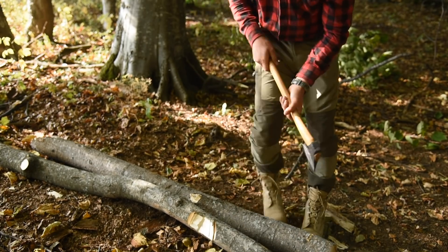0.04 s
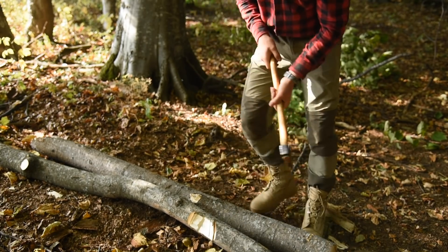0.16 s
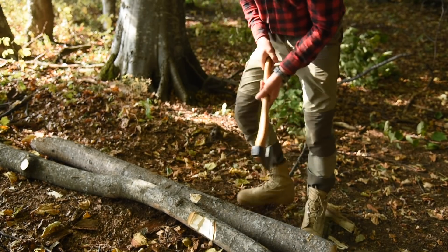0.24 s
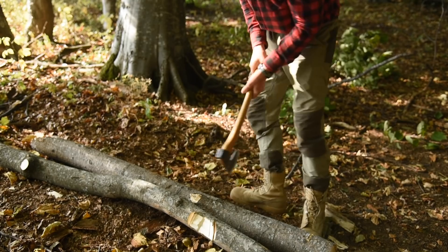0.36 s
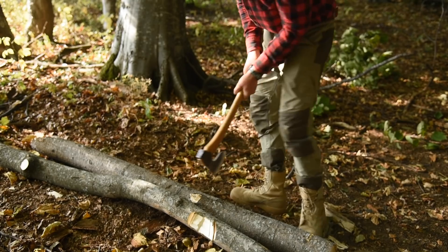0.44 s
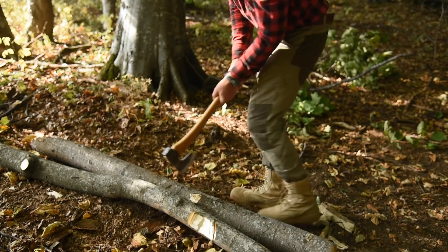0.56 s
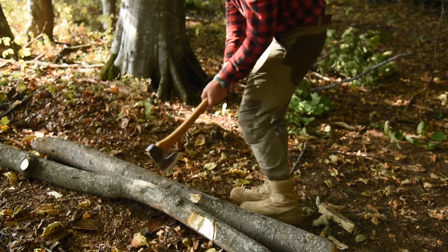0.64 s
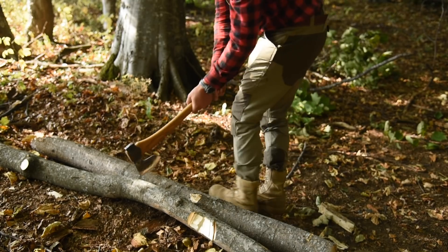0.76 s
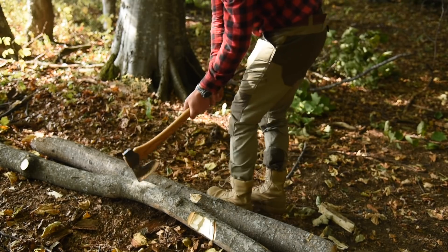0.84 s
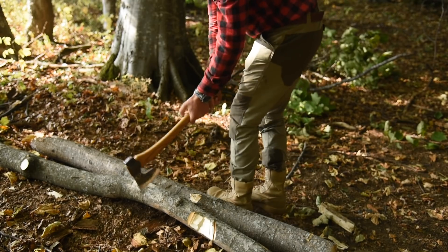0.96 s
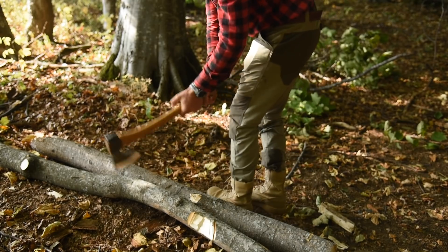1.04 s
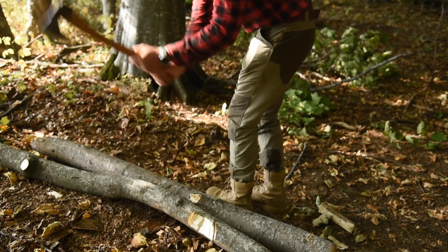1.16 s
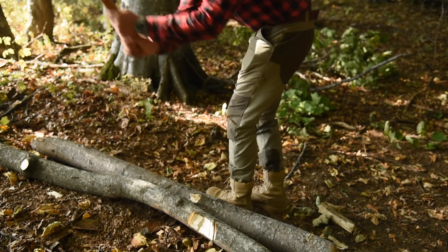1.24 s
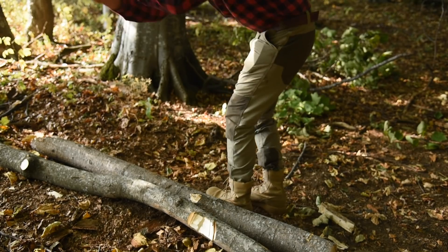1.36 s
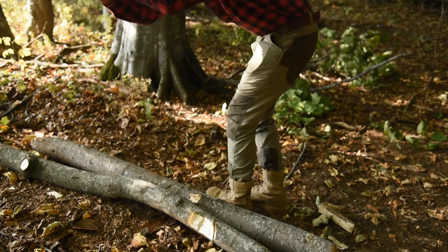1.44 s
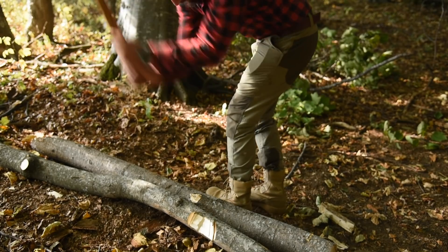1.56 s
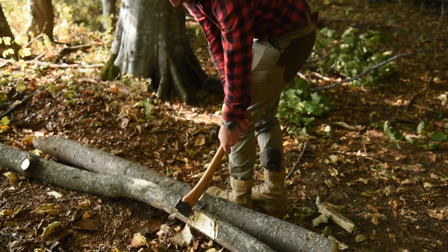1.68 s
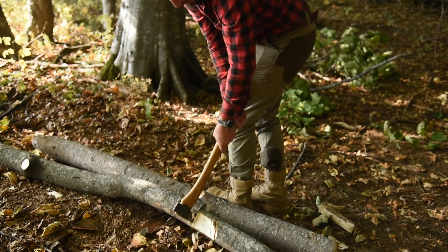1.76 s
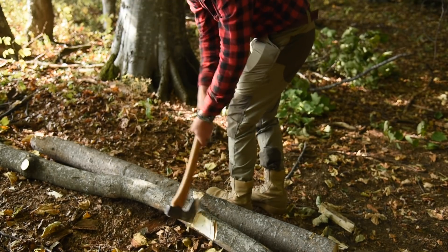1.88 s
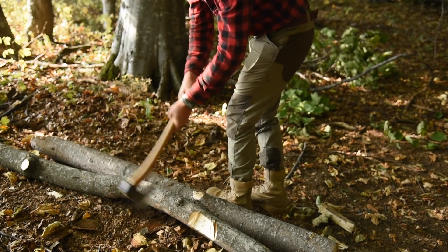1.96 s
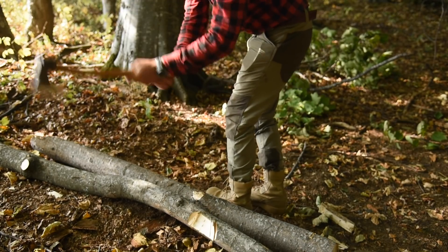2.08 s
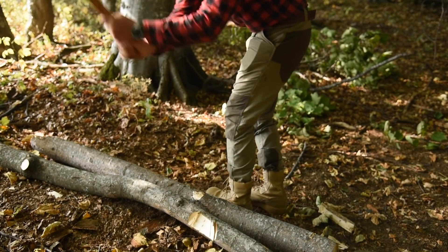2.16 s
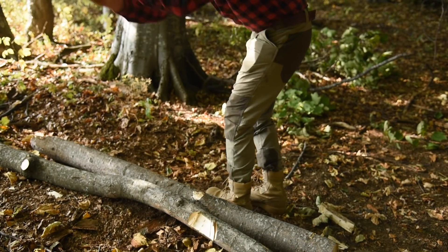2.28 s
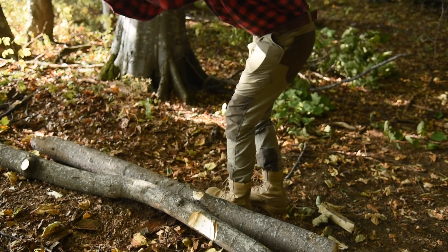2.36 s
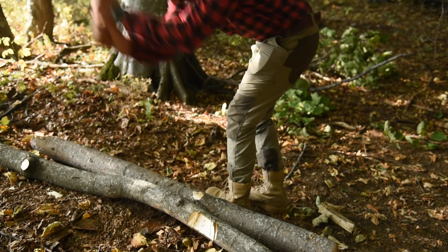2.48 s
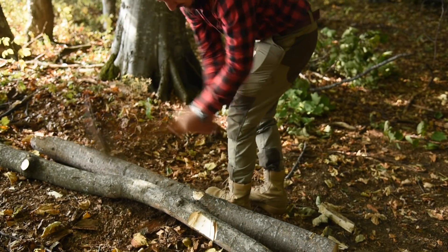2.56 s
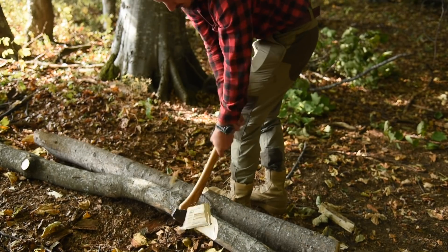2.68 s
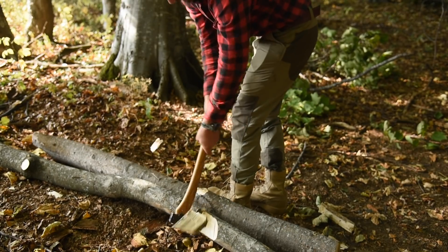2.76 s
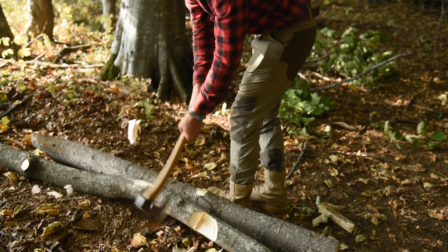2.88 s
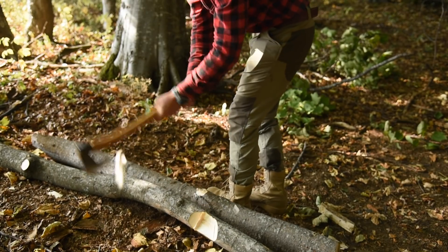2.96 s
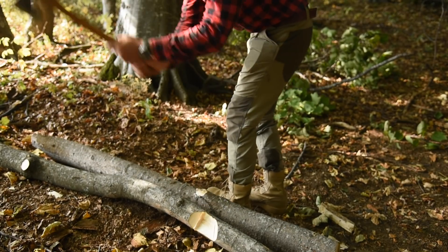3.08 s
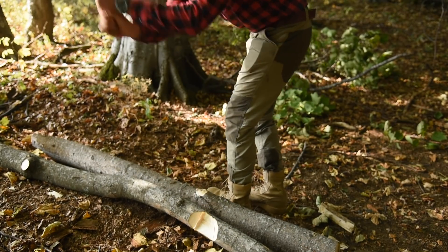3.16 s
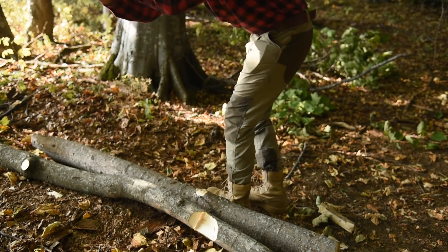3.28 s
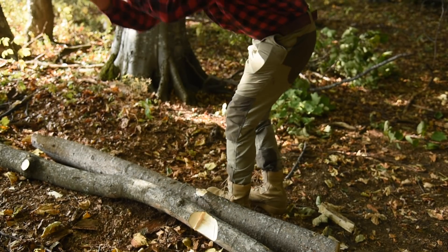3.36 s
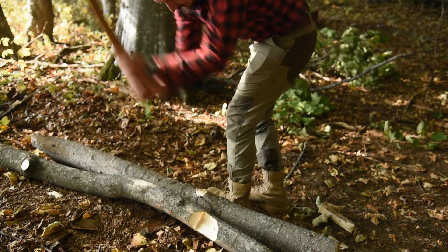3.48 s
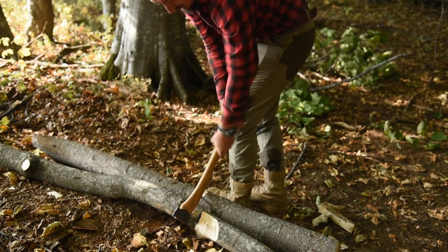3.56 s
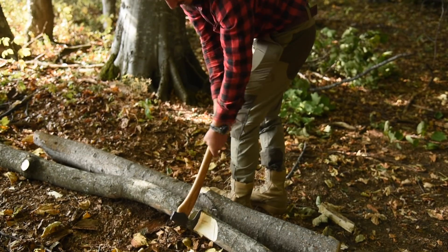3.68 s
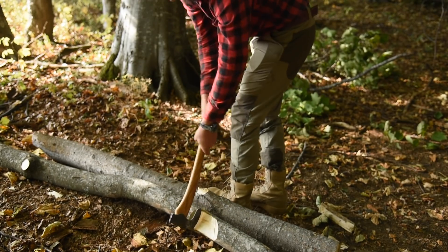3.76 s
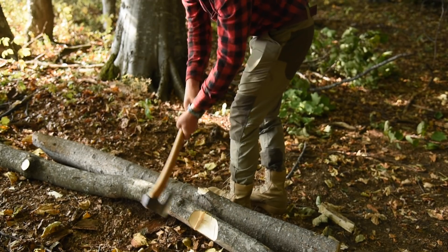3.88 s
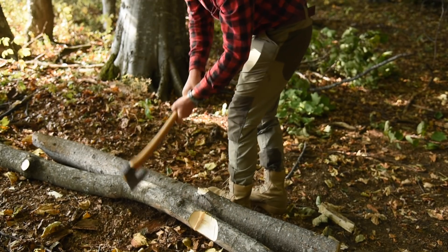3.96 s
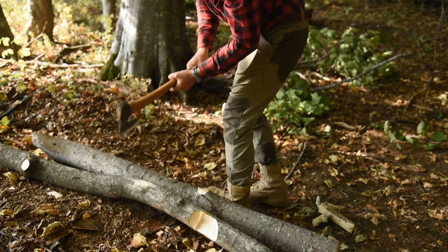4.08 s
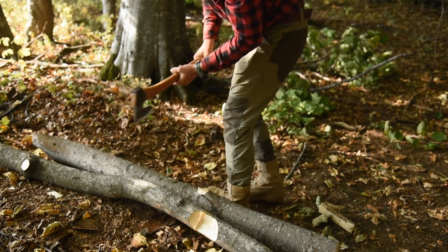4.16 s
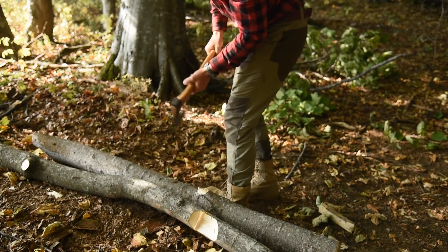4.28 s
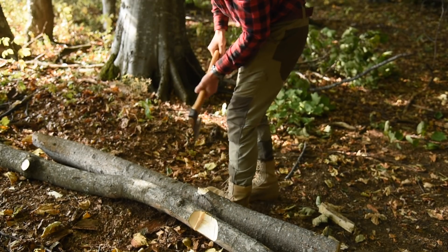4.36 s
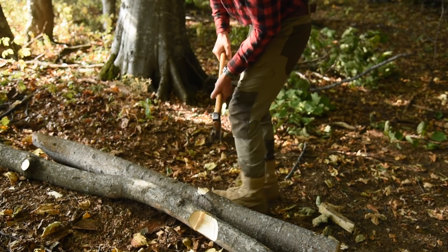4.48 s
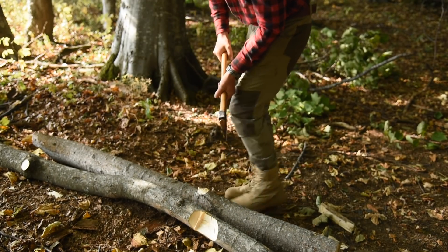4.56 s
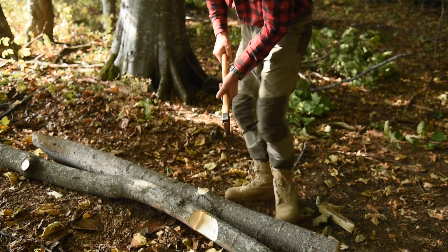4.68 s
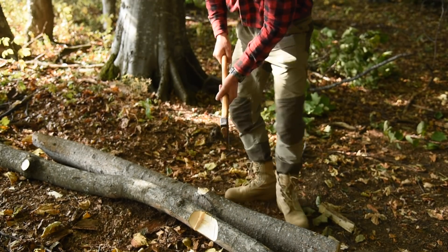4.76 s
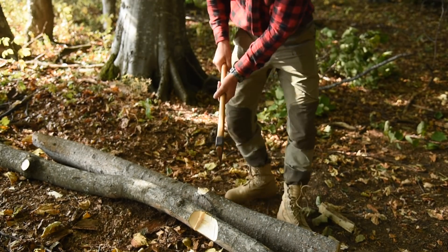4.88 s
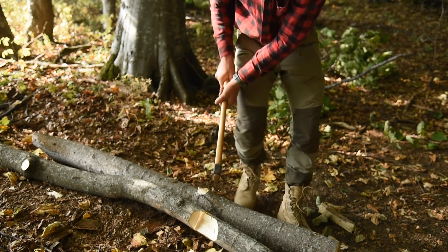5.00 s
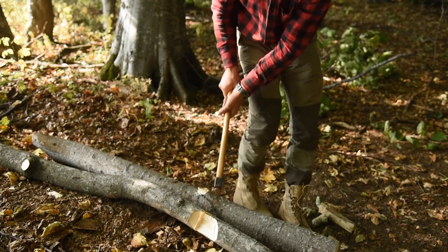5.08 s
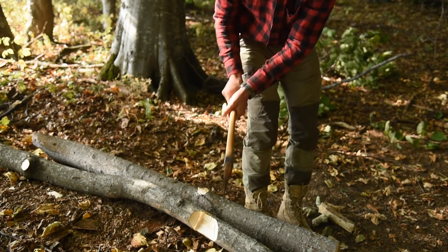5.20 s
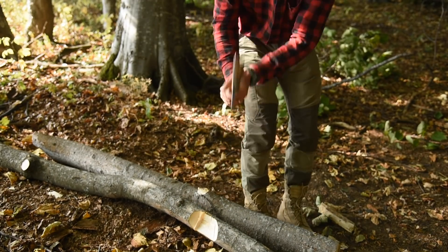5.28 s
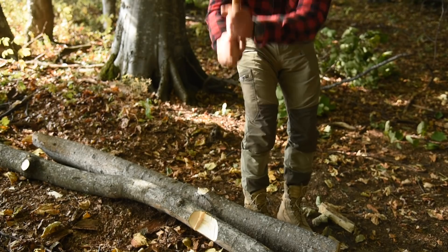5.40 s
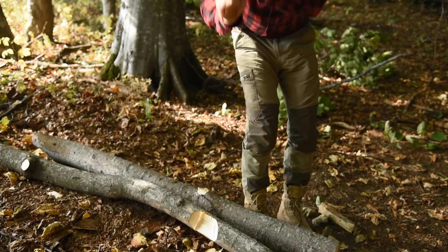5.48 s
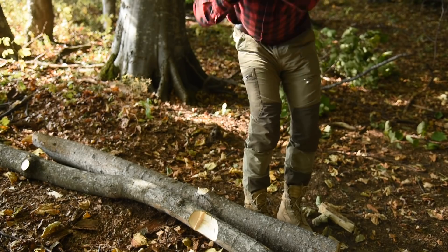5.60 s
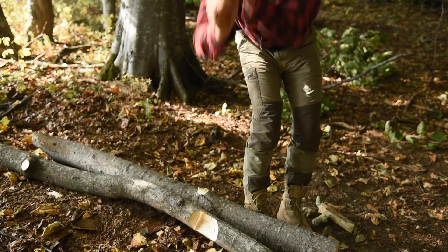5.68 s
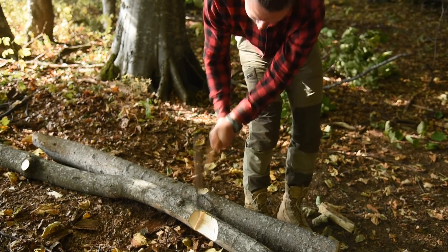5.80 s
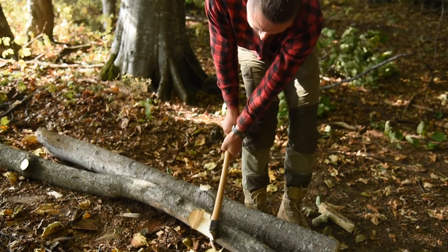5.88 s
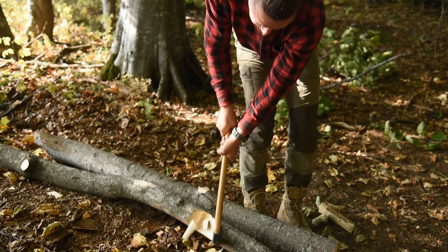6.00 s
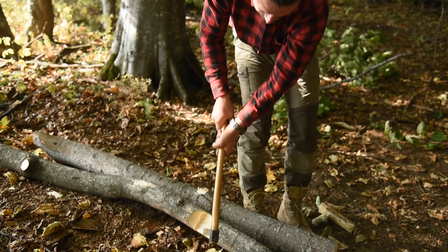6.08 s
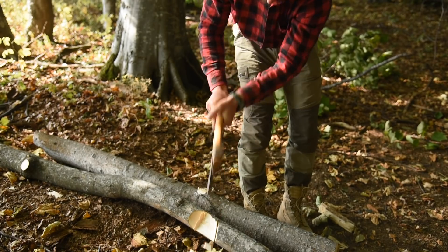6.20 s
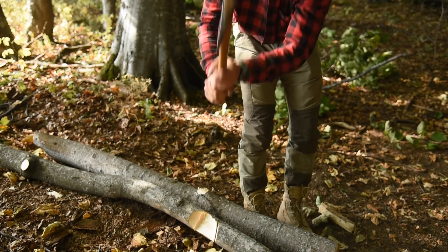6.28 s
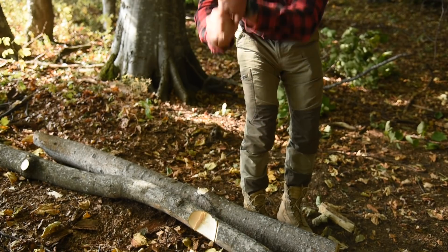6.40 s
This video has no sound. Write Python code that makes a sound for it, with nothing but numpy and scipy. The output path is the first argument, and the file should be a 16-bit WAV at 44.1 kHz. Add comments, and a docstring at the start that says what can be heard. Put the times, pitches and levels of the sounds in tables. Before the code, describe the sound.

An axe cracks into a log four times in a forest, with scattering chips and boots rustling dry leaves.

```python
"""Dry leaves rustle and twigs snap under shifting boots, over a faint forest hush.
Then an axe bites four times into a log lying on the leaves: the blade cracks in, fibres and chips tear,
the log rings in its bending modes and bounces. Chips and bark rain down after each blow.
The trunks answer with echoes and a long tail; the close microphone overloads on the blows."""
import sys
import numpy as np
from scipy import signal
from scipy.fft import rfft, irfft, next_fast_len
from scipy.io import wavfile
from scipy.ndimage import uniform_filter1d, map_coordinates

SR = 44100
rng = np.random.default_rng(int(sys.argv[2]) if len(sys.argv) > 2 else 0)


def wav_out(sig):
    """Save sig, one row per channel (or a flat mono array), as 16-bit PCM at SR to the path in sys.argv[1]."""
    wavfile.write(sys.argv[1], SR, np.round(np.clip(np.atleast_2d(sig).T, -1, 1) * 32767).astype(np.int16))


N = 284004

# noise spectra: f/Hz, relative density/dB
AIR_SPECTRUM = [(12, -28), (20, 2.5), (70, -0.5), (141, -6.5), (172, -7), (203, -2), (292, -5.5), (317, -5),
                (524, -8.5), (2120, -15.5), (2570, -13), (4760, -25.5), (8090, -19.5), (9560, -22.5),
                (15800, -24)]  # forest air, microphone hiss
LEAF_SPECTRUM = [(290, -22), (500, 2), (1090, 3.5), (1710, -0.5), (2420, -2), (3730, -1.5), (4180, -1.5),
                 (5190, -6.5), (6270, -8.5), (11700, -16), (15800, -25.5)]  # dry leaves
SOIL_SPECTRUM = [(29, -42), (50, -5), (222, 3.5), (546, -3.5), (808, -4.5), (1160, -9), (1300, -7.5),
                 (1720, -15.5), (2500, -17.5), (3250, -52.5), (5500, -120)]  # weight on soft ground
THUD_SPECTRUM = [(30, -61), (60, 6.5), (110, 10), (170, -1), (300, -35.5)]  # thud in the ground
FIBRE_SPECTRUM = [(410, -27.5), (700, 4.5), (897, -6), (1080, -1.5), (1340, -8.5), (1530, -14.5),
                  (1660, -13.5), (7610, -25.5), (15800, -45.5)]  # tearing fibres
TAIL_SPECTRUM = [(150, -41.5), (260, -9.5), (325, 3.5), (466, -2.5), (729, -3), (822, -4), (1450, -9),
                 (2150, -14), (4660, -11.5), (12900, -25.5), (15800, -43.5)]  # forest tail
# leaves shifting underfoot: t/s, level/dB
RUSTLE_LEVELS = [(0, -50), (.88, -51.5), (1.2, -56), (3.8, -65), (4.45, -53.5), (5.18, -45.5), (5.44, -55),
                 (5.75, -52), (6.44, -47)]
# chips tearing free of the log during a blow; chips, bark and boots crushing leaves:
# t/s, level/dB, t60/s, tilt/(dB/oct)
CRUNCHES = [(0.0248, -29.5, 0.058, -5.5), (.195, -35, 0.023, -11), (0.345, -40, 0.068, 4),
            (0.3919, -34, 0.25, 8), (0.4718, -34, 0.063, 1), (0.5069, -24, 0.043, 4),
            (.7701, -36, .03, 4.5), (1.993, -16.5, 0.14, 3), (2.0099, -18, 0.035, 0.5),
            (2.0889, -30.5, 0.069, 3.5), (2.2106, -33.5, 0.14, 1.5), (2.2655, -25, .07, 7),
            (2.42, -45, .11, 1), (2.7237, -0.5, 0.07, -9), (3.0018, -16, 0.025, 5),
            (3.0128, -21.5, 0.13, 3), (3.1197, -15, .11, 2), (3.3461, -31, 0.12, 3),
            (3.4481, -22, 0.11, 2.5), (3.6697, -5, .048, 0.5), (3.7515, -19, 0.097, 1.5),
            (3.8452, -25.5, 0.018, 9), (4.0044, -23, 0.14, 4), (4.093, -34.5, .1, 4),
            (4.1609, -21.5, .059, 2), (4.1759, -26, .16, 3.5), (4.2195, -35, 0.15, 6),
            (4.9454, -28, 0.03, 2), (4.9959, -34.5, 0.076, 10), (5.9448, -12, 0.088, 2.5),
            (6.0725, -16, 0.14, 2.5), (6.0857, -35.5, 0.036, -12), (6.2157, -34.5, 0.062, 6),
            (6.2694, -23, 0.056, 3.5), (6.348, -39.5, 0.15, 8)]
# twig snaps, chip ticks: t/s, level/dB, f/Hz, t60/s
TWIG_SNAPS = [(.026, -19.5, 2800, 0.004), (.195, -29, 750, 0.0069), (.346, -27, 597, 0.007),
              (.875, 2, 1800, 0.0014), (.875, -2.5, 473, 0.0087), (.967, -23, 890, 0.0038),
              (1.052, -10.5, 1160, 0.0042), (1.052, -22.5, 2610, 0.0065), (1.932, -13, 1840, 0.009),
              (2.304, -2.5, 2250, 0.00072), (2.345, -19, 7700, 0.0011), (3.0174, -8, 2580, 0.01),
              (3.037, -11, 1800, 0.0023), (3.1379, -7.5, 1690, 0.0051), (3.358, -6.5, 875, 0.002),
              (3.759, -6.5, 3700, 0.0076), (4.591, -29, 5030, .003), (4.688, -18.5, 303, 0.0073),
              (4.737, -28.5, 3500, .0022), (4.778, -28, 227, 0.039), (5.366, -32, 2440, 0.011),
              (5.995, -6, 1470, 0.0059), (6.023, -4, 1730, 0.0093), (6.271, -19.5, 2840, 0.011)]
# boots on litter: t/s, length/s, leaves/dB, leaf tilt/(dB/oct), scuff/dB, heel/dB
BOOT_STEPS = [(.395, 0.041, -44.5, -0.5, -38, -26), (.455, 0.09, -40.5, 1, -47.5, -37),
              (.815, 0.06, -44, 0.5, -36.5, -34), (3.257, 0.092, -43, 2, -62, -51),
              (3.351, 0.037, -44, 3, -53, -57), (4.325, 0.085, -45, 4.5, -42, -36),
              (4.487, 0.062, -60, -17, -48, -55), (4.619, .11, -45.5, 8.5, -50, -47),
              (4.881, 0.086, -37.5, -1, -42.5, -37.5), (4.969, 0.097, -42.5, 3, -44.5, -40),
              (5.195, 0.08, -32, -6, -27, -29)]
# bending modes of the log: f/Hz, level/dB, t60/s
LOG_MODES = [(118.2, -15.5, 0.56), (148.4, -13, 0.32), (203.6, -6, 0.26), (262, -3.5, 0.23),
             (316.2, -6, 0.27), (341.8, -7, 0.3), (385.5, -3.5, 0.18), (474.7, -7, 0.12), (551, -6, 0.23),
             (609.6, -5, 0.23), (734, -19, 0.23), (775.4, -17.5, 0.3), (879, -1.5, 0.17),
             (1008, -14.5, 0.15), (1188, -25.5, 0.47), (1307, -1.5, 0.071), (1391, -18.5, 0.32),
             (1470, -12.5, 0.11), (1680, -16, 0.025), (2284, -39.5, .06)]
# light taps on the log: t/s, level/dB, contact corner/Hz
LOG_TAPS = [(0.8754, -12, 710), (1.051, -25, 1880), (4.939, -19.5, 402)]
# log hitting the ground after a blow: delay/s, level/dB re ring
LOG_REBOUNDS = [(.12, -14), (.188, -10.5)]
# blows: t/s, ring/dB, damping factor, place along log (0-1), ring tilt/(dB/oct), crack/dB,
# tear/dB, tear t60/s, forest tail/dB, bite pitch/Hz, chip shower/dB
AXE_BLOWS = [(1.726, 1, 1.31, .31, 0, 3.5, -6.5, 0.29, -20, 3600, -45),
             (2.676, 0.5, 1.076, 0.41, -0.05, 13, -13, 0.25, -20, 1600, -36.5),
             (3.638, 0, 1.03, .23, -1.5, 11, -17.5, 0.098, -21, 6640, -46),
             (5.915, -2, 0.87, 0.37, -0.3, 3.5, 4.5, .13, -17, 2890, -52)]
# axe head and wood wedge, damped by the cut: f/Hz, width/Hz, level/dB
HEAD_MODES = [(1600, 480, -14), (2540, 470, -13.5), (3600, 570, -15.5), (4740, 440, -11.5),
              (5440, 820, -8.5), (7500, 2600, -13), (9160, 1300, -11)]
# echoes off the nearest trees: delay/s, level/dB
TRUNK_ECHOES = [(.017, -15), (0.029, -16.5), (0.045, -9.5), (.064, -33.5), (.095, -16.5)]
# forest decay: f/Hz, t60/s
FOREST_DECAY = [(60, 0.55), (300, 0.75), (1000, 1.11), (3000, 0.88), (8000, 0.79), (15000, 0.24)]
# microphone port response: f/Hz, gain/dB
MIC_PORT = [(4600, 0), (5500, 1), (6100, -3), (6600, -1), (7300, 1.5), (8200, 1.5)]


def amp(db):
    """Decibels to gain."""
    return 10 ** (np.asarray(db) / 20)


def unit_rms(x):
    """x scaled to rms 1."""
    return x / np.sqrt(np.mean(x ** 2) + 1e-20)


def along(points, hz):
    """(f/Hz, value) points interpolated on a log axis."""
    knots_hz, values = np.transpose(points)
    return np.interp(np.log(hz + 1), np.log(knots_hz + 1), values)


def filtered(x, response):
    """x shaped by response(hz)."""
    size = next_fast_len(x.shape[-1] + 8192)
    return irfft(rfft(x, size) * response(np.fft.rfftfreq(size, 1 / SR)), size)[..., :x.shape[-1]]


def noise(count, spectrum, tilt_db_oct=0, spiky_db=0):
    """Coloured noise, rms 1; spiky_db scatters larger grains."""
    grains = rng.standard_normal(count) * amp(spiky_db * np.minimum(rng.exponential(size=count), 4))
    colour = lambda hz: amp(along(spectrum, hz) + tilt_db_oct * np.log2((hz + 50) / 4000))
    return unit_rms(filtered(grains, colour))


def patchy(x, depth_db):
    """Random gain in patches of about 3 kHz by 2 ms: each leaf or splinter ticks at its own pitch."""
    bins = signal.stft(x, nperseg=96)[2]
    field = uniform_filter1d(rng.standard_normal(bins.shape), size=7, axis=0)
    field = unit_rms(uniform_filter1d(field, size=2, axis=1))
    return unit_rms(signal.istft(bins * amp(depth_db * field), nperseg=96)[1][:len(x)])


def wobble(rate_hz):
    """Smooth random curve through knots at rate_hz."""
    knots = rng.standard_normal(int(N * rate_hz / SR) + 4)
    return map_coordinates(knots, [np.arange(N) * rate_hz / SR])


def add(track, at_s, sound):
    """Mixes sound into track."""
    part = track[max(round(at_s * SR), 0):][:len(sound)]
    part += sound[:len(part)]


def decay(t, t60_s):
    """Exponential fall."""
    return amp(-60 * t / t60_s)


def swell(t, rise_s, t60_s):
    """Exponential rise and fall."""
    return (1 - np.exp(-t / rise_s)) * decay(t, t60_s)


def hump(hz, centre_hz, width_hz):
    """Resonance gain, 1 at centre."""
    return 1 / (1 + ((hz - centre_hz) / (width_hz / 2)) ** 2)


def air():
    """Far hush, wavering slightly."""
    return amp(-52 + 0.27 * wobble(13)) * noise(N, AIR_SPECTRUM)


def litter(flight_s=0.29, crisp_share=0.36):
    """Leaves crackle underfoot and under the chip shower after each blow."""
    t = np.arange(N) / SR
    level = amp(np.interp(t, *np.transpose(RUSTLE_LEVELS)))
    for at_s, *_, shower_db in AXE_BLOWS:
        add(level, at_s + flight_s, amp(shower_db) * swell(t, rise_s=0.094, t60_s=2.3))
    dull, crisp = (patchy(noise(N, LEAF_SPECTRUM, tilt, spiky_db=1.5), depth_db=3) for tilt in (-2.5, 4))
    flicker = amp(3.5 * wobble(32) + 0.86 * wobble(70))
    return level * flicker * (np.sqrt(1 - crisp_share) * dull + np.sqrt(crisp_share) * crisp)


def crunches(rise_s=0.0022, thud_db=-17.5):
    """Chips tear free of the log in a blow; chips, bark and boots crush leaves. Crackle plus thud."""
    out, t = np.zeros(N), np.arange(SR // 3) / SR
    for at_s, db, t60_s, tilt_db_oct in CRUNCHES:
        patch_hz = 1850 * 2 ** rng.normal(0, 0.45)
        crackle = noise(len(t), LEAF_SPECTRUM, tilt_db_oct, spiky_db=2.5)
        crackle = filtered(crackle, lambda hz: 0.54 + 0.88 * hump(hz, patch_hz, 1200))
        envelope = swell(t, rise_s, t60_s) + 0.5 * decay(t, 0.0076)
        add(out, at_s, amp(db) * envelope * patchy(crackle, depth_db=3.5))
        add(out, at_s, amp(db + thud_db) * swell(t, rise_s, 1.42 * t60_s) * noise(len(t), SOIL_SPECTRUM))
    return out


def snaps():
    """Twigs and chips: one short resonance plus a faster-dying overtone, low-passed by the contact."""
    out, t = np.zeros(N), np.arange(SR // 8) / SR
    for at_s, db, hz, t60_s in TWIG_SNAPS:
        body = np.sin(2 * np.pi * hz * t) * decay(t, t60_s)
        overtone = 0.45 * np.sin(2 * np.pi * 1.4 * hz * t) * decay(t, 0.5 * t60_s)
        onset = (1 - np.exp(-t * hz / 0.19)) ** 2
        corner_hz = 3 * hz
        contact = lambda f: 1 / (1 + 1j * np.sqrt(2) * f / corner_hz - (f / corner_hz) ** 2) ** 2
        add(out, at_s, amp(db) * filtered((body + overtone) * onset, contact))
    return out


def boots():
    """The sole presses and lifts: leaves crunch, soil scuffs, the heel thuds."""
    out, t = np.zeros(N), np.arange(SR // 4) / SR
    for at_s, length_s, leaves_db, tilt_db_oct, scuff_db, heel_db in BOOT_STEPS:
        count = round(length_s * SR)
        press = np.sin(np.pi * np.arange(count) / count) ** 0.83
        leaves = patchy(noise(count, LEAF_SPECTRUM, tilt_db_oct, spiky_db=7), depth_db=6)
        scuff = patchy(noise(count, SOIL_SPECTRUM, tilt_db_oct=1, spiky_db=2.5), depth_db=3)
        add(out, at_s, press * (amp(leaves_db) * leaves + amp(scuff_db) * scuff))
        heel = swell(t, 0.0082, 0.1) * noise(len(t), THUD_SPECTRUM)
        add(out, at_s + 0.54 * length_s, amp(heel_db) * heel)
    return out


def log_ring(t, drive, damping, rise_cycles, airborne_s, choke_db_per_s=700):
    """Bending modes build up, waver as the log rocks, and are choked once it lands."""
    hz, level_db, t60_s = np.transpose(LOG_MODES)[:, :, None]
    rocking = uniform_filter1d(rng.standard_normal((len(hz), len(t))), size=900, axis=1)
    phase = 2 * np.pi * hz * t + 14 * rocking * np.sqrt((hz + 150) / 450)
    onset = (1 - np.exp(-t * hz / rise_cycles)) ** 2
    fall_db = -60 * t * damping / t60_s - choke_db_per_s * np.maximum(t - airborne_s, 0)
    return np.sum(drive * amp(level_db + fall_db) * onset * np.sin(phase), axis=0)


def knocks(rebound_corner_hz=160, rebound_damping=1.1, tap_damping=5.2):
    """Taps and rebounds: a soft contact drives the log modes below its corner."""
    out, t = np.zeros(N), np.arange(SR // 3) / SR
    mode_hz = np.transpose(LOG_MODES)[0][:, None]
    taps = [(*tap, tap_damping) for tap in LOG_TAPS]
    rebounds = [(at_s + delay_s, ring_db + db, rebound_corner_hz, rebound_damping)
                for at_s, ring_db, *_ in AXE_BLOWS for delay_s, db in LOG_REBOUNDS]
    for at_s, db, corner_hz, damping in rebounds + taps:
        drive = 1 / (1 + (mode_hz / corner_hz) ** 4)
        add(out, at_s, amp(db) * log_ring(t, drive, damping, rise_cycles=0.81, airborne_s=0.065))
    return out


def axe():
    """The head swishes down, cracks in, tears fibres, rings the log, shakes the ground; trees answer."""
    out, t = np.zeros(N), np.arange(3 * SR // 2) / SR
    order = np.arange(1, len(LOG_MODES) + 1)[:, None]
    octaves = np.log2(np.transpose(LOG_MODES)[0][:, None] / 400)
    for (at_s, ring_db, damping, place, tilt_db_oct, crack_db,
         tear_db, tear_t60_s, tail_db, bite_hz, _) in AXE_BLOWS:
        drive = 1.44 + np.abs(np.sin(np.pi * order * place))  # weaker near a node
        drive *= amp(tilt_db_oct * octaves + rng.normal(0, 1.8, order.shape))
        ring = log_ring(t[:SR // 2], drive, damping, rise_cycles=3.86, airborne_s=0.27)
        add(out, at_s, amp(ring_db) * ring)
        fibres = axe_head(patchy(noise(len(t), FIBRE_SPECTRUM, spiky_db=0.5), depth_db=8.5), bite_hz)
        add(out, at_s, fibres * (amp(crack_db) * decay(t, 0.026) + amp(tear_db) * decay(t, tear_t60_s)))
        for delay_s, echo_db in TRUNK_ECHOES:
            echo = swell(t[:2000], 0.0028, 0.017) * fibres[round(delay_s * SR) + 5000:][:2000]
            add(out, at_s + delay_s, amp(crack_db + echo_db) * echo)
        add(out, at_s, amp(tail_db) * axe_head(forest_tail(t), bite_hz))
        shudder = swell(t, 0.019, 0.98) * noise(len(t), THUD_SPECTRUM, tilt_db_oct=-11.5)
        add(out, at_s, amp(-26.5) * shudder)
        to_impact_s = t[:SR // 5][::-1]
        swish = decay(to_impact_s, 0.17) * noise(len(to_impact_s), SOIL_SPECTRUM)
        add(out, at_s - len(swish) / SR, amp(-37.5) * swish)
    return out


def axe_head(x, bite_hz, lift_db=19, reach_oct=0.45):
    """Head and wedge resonances colour x; those near the bite pitch are lifted."""
    nearness = lambda hz: np.exp(-(np.log2(hz / bite_hz) / reach_oct) ** 2)
    modes = lambda hz: sum(amp(db + lift_db * nearness(mode_hz)) * hump(hz, mode_hz, width_hz)
                           for mode_hz, width_hz, db in HEAD_MODES)
    return filtered(x, lambda hz: 0.95 + modes(hz))


def forest_tail(t, rise_s=0.013):
    """Diffuse answer of the trunks; each frequency dies at its own rate."""
    scatter = patchy(noise(len(t), TAIL_SPECTRUM), depth_db=1.5)
    hz, frame_s, bins = signal.stft(scatter, SR, nperseg=256)
    bins *= decay(frame_s, along(FOREST_DECAY, hz)[:, None])
    tail = signal.istft(bins, SR, nperseg=256)[1][:len(t)]
    return tail * (1 - np.exp(-t / rise_s))


def scene():
    """All sources, mono."""
    return (air() + litter() + crunches() + snaps() + boots() + knocks() + axe())[None]


def record(dry, knee=14, low_cut_hz=33, roll_off_hz=14000, limit_hz=15900):
    """Port dip near 6 kHz, input overload on the blows, bass and treble trim, band limit."""
    coloured = filtered(dry, lambda hz: amp(along(MIC_PORT, hz)))
    clipped = coloured / (1 + np.abs(coloured) ** knee) ** (1 / knee)
    trim = lambda hz: 1j * hz / (low_cut_hz + 1j * hz) / np.sqrt(1 + (hz / roll_off_hz) ** 4)
    return np.clip(filtered(clipped, lambda hz: trim(hz) * (hz < limit_hz)), -1, 1)


dry = scene()
out = record(dry)
wav_out(out)
```